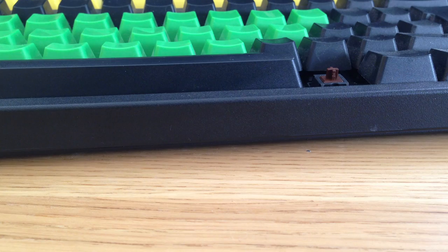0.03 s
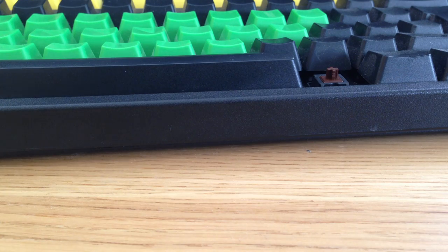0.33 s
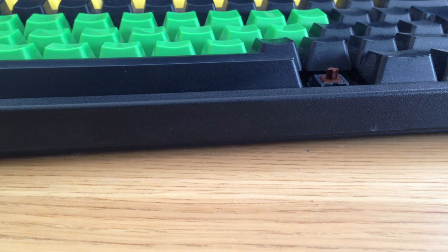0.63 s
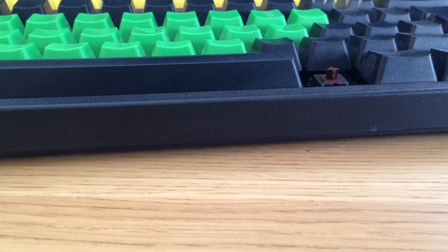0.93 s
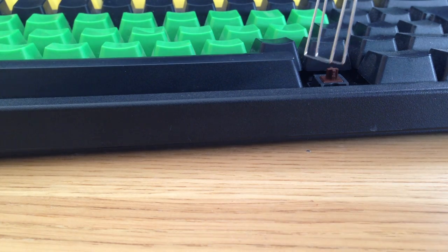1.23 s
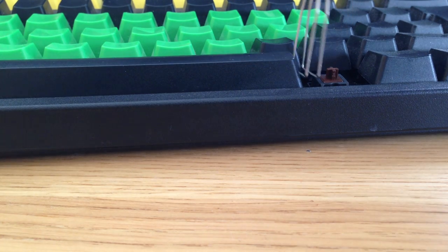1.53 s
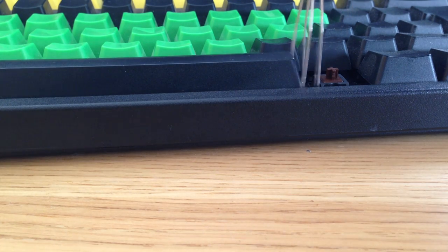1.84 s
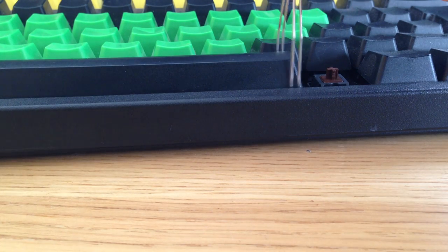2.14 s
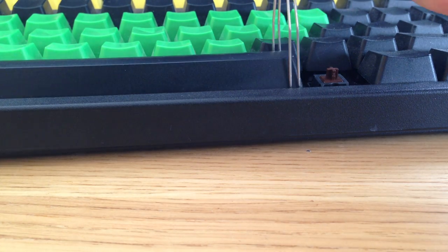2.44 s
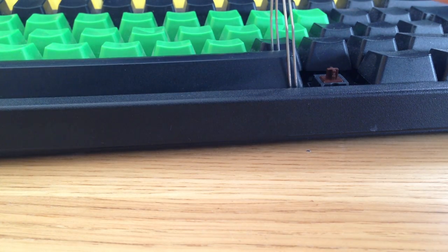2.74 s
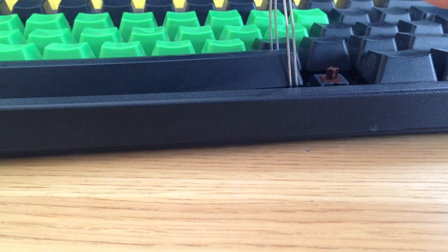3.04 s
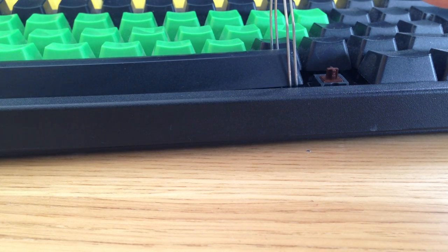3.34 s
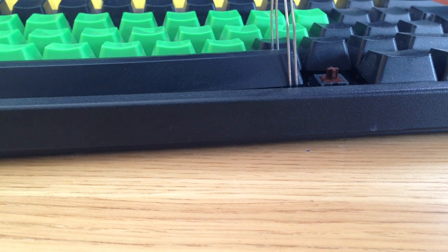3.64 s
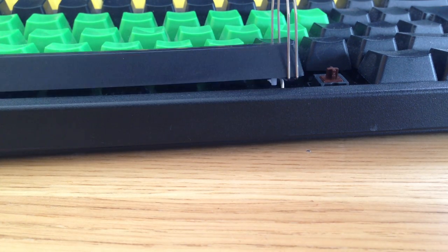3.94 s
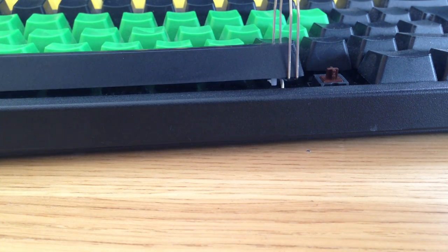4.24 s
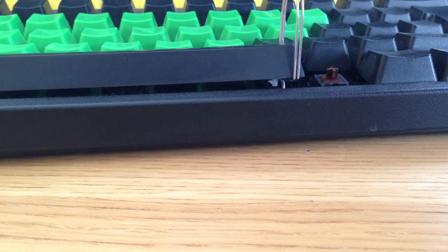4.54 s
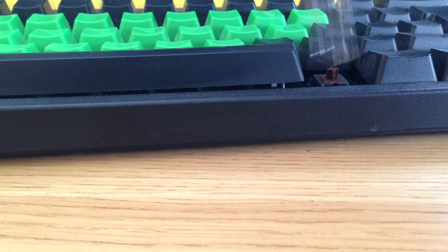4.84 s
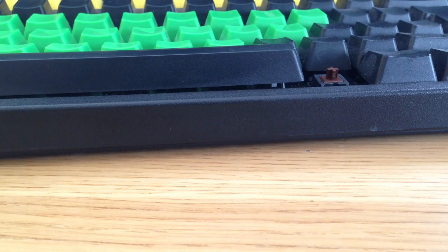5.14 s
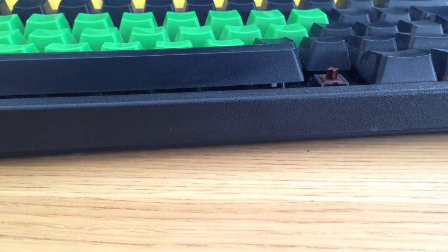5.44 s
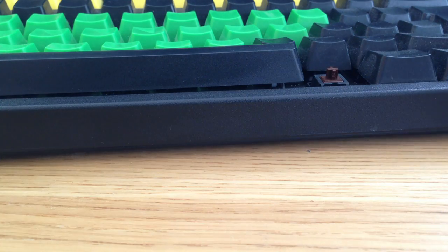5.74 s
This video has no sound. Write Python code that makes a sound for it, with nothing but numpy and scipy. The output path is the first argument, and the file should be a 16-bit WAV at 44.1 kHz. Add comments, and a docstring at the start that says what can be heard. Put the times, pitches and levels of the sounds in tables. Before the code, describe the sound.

A quiet furnished room holds faint ventilation and a low electrical hum throughout. At about 1.2 seconds, close to the microphone, a wire puller touches a keyboard's plastic keycaps with a tiny squeak, then lands with a sharp, bouncing click at 1.3. Light ticks, short gritty rubs and brief wire pings continue until a bright click at 2.4. One small ping comes at 3 seconds, followed by a couple of barely audible ticks. Around 4 seconds the spacebar comes off its switch with a quick creaking pop and a slight thud. At 4.8 the wires spring free with a bright ping and a very short chatter, followed by a faint squeak. From 5.6 to 5.9 the loose, hollow spacebar clatters in a rapid run of plastic clacks, the loudest moment, ending with a low double knock into the wooden desk. Everything sounds close and fairly dry.

```python
"""A wire keycap puller works the spacebar off a mechanical keyboard, close up on a wooden desk.
The wires tick and rub against the caps, the bar pops off its stem, the puller springs free with a
chatter and a squeak, and the loose bar clatters on its stabiliser. Each contact is a touch and a short
gritty slide that ring the part and the case; heavy blows also knock the desk.
Behind it all is a quiet, furnished room with faint ventilation and mains hum."""
import sys
import numpy as np
from scipy import signal
from scipy.fft import rfft, irfft
from scipy.io import wavfile
from scipy.ndimage import uniform_filter1d

SR = 44100
rng = np.random.default_rng(int(sys.argv[2]) if len(sys.argv) > 2 else 0)


def transcribe(u):
    """Save the signal u as a 16-bit wav file named by the first command-line argument.

    u: samples, shape (n,) or (channels, n), limited to [-1, 1]; the rate is SR.
    q: integer samples, one column per channel.
    """
    v = np.clip(np.atleast_2d(u).T, -1, 1)
    q = np.round(v * 32767).astype(np.int16)
    wavfile.write(sys.argv[1], SR, q)


N = 260190
TIME, RING_T = np.arange(N) / SR, np.arange(SR // 4) / SR

# Contact levels are set ahead of each part's gain; a harder touch has more treble and less clack.
# wires ticking on the caps: start_s, slide_s, level_db, hardness_db, thud_db
PULLER_HITS = [(1.194, .013, -49, -2.5, -65), (1.2885, .0015, -53, -2, -68), (1.301, .002, -47.5, 3, -67),
               (1.526, .004, -48.5, 0, -76), (1.5958, .0033, -43, 3, -66), (1.667, .009, -51.5, 1, -50),
               (1.939, .011, -41.5, -2.5, -70), (1.9662, .0046, -40, -4.5, -33.5),
               (1.992, .003, -50, 4.5, -43), (2.0198, .0046, -36, -1.5, -43.5),
               (2.1828, .0046, -53, -2.5, -52), (2.2155, .003, -54, -4, -44), (2.266, .012, -53, -3, -61),
               (2.4055, .003, -33.5, 7, -72), (2.411, .004, -34, 5.5, -60), (2.4298, .002, -44, -2.5, -43),
               (3.039, .0023, -48, 0, -63), (3.132, .003, -61, -7, -59), (3.7905, .003, -56, -10.5, -59),
               (4.786, .0056, -53, 3, -70)]
# the puller's hard landing on a cap: start_s, slide_s, level_db, hardness_db, thud_db
LANDING = (1.3176, .0012, -26, 9.5, -56)
# the struck cap rattling in its play: delay_s, slide_s, level_db, hardness_db, thud_db
CAP_RATTLE = (.0155, .003, -46, 1, -69)
# wires springing over the bar's edge: start_s, slide_s, level_db, hardness_db, thud_db
RELEASE = (4.8001, .0022, -31.3, 0, -63)
# knocks of the loose spacebar: start_s, slide_s, level_db, hardness_db, thud_db
BAR_HITS = [(5.6005, .0035, -26.5, 5, -55), (5.6508, .0035, -32.5, 0, -54), (5.675, .004, -44, -6, -52),
            (5.6972, .0046, -17.5, -2.5, -41), (5.7242, .0033, -17.3, -1, -47),
            (5.7525, .005, -41.5, 7, -50), (5.7635, .0055, -30, 2.5, -43), (5.7735, .006, -30, -2.5, -45),
            (5.808, .018, -41, 7.5, -40), (5.8488, .0005, -25, 0, -34), (5.877, .0016, -32, 0, -44)]
# creak, pop and knocks at the switch: start_s, slide_s, level_db, hardness_db, thud_db
SWITCH_HITS = [(3.971, .005, -38.5, 0, -39), (3.9757, .002, -30, 4.5, -38), (3.9862, .0014, -25, -4, -33.5),
               (4.0048, .0022, -45, 0, -35), (5.8325, .005, -33, 1.5, -25)]
# plucked wires: start_s, pitch_hz, peak_db, t60_s
WIRE_PINGS = [(1.3178, 6500, -25, 0.027), (1.9665, 3750, -31, .018), (2.02, 3700, -27, .022),
              (2.406, 3530, -29, 0.036), (2.4062, 10500, -27, .022), (2.4125, 13400, -30, .02),
              (2.413, 6910, -28, 0.024), (3.038, 2610, -33, 0.022), (4.7993, 8650, -12.5, 0.0096),
              (5.6, 5570, -25.5, 0.056), (5.651, 2705, -28, .04)]
# wires sliding on plastic: start_s, length_s, rumble_db (before its trim), scratch_db
RUBS = [(1.205, .09, -61, -54.5), (1.62, .08, -56, -62), (1.722, .09, -47, -53), (2.19, .11, -51, -56)]
# a wire dragging on a cap: start_s, length_s, pitch_hz, level_db
SQUEAKS = [(1.186, .036, 4300, -44), (4.87, .03, 1790, -57), (4.905, .05, 1810, -50.5)]
# blows that press the keyboard onto the desk: start_s, level_db
DESK_KNOCKS = [(1.318, -38), (3.977, -43), (5.833, -28), (5.849, -33)]

# ring of the puller against a cap: pitch_hz, gain_db, t60_s
PULLER_MODES = [(440, -17, 0.023), (702, -8.5, 0.0294), (840, -15, 0.036), (1119, -1, .04),
                (1352, 1, 0.033), (1743, 0.5, 0.032), (2148, -6, 0.028), (2730, 2.5, 0.024),
                (3730, 9.5, 0.023), (4260, 2, .016), (5070, -3, .014), (6450, 3, 0.0089),
                (7080, -1, 0.0093), (7720, -9, 0.0085), (8950, 2, 0.0092), (10500, -10, .009),
                (13300, -13.5, 0.0072)]
# ring of the sprung wire loop: pitch_hz, gain_db, t60_s
WIRE_MODES = [(480, -18, 0.037), (741, 7, .045), (1035, -2, .05), (1383, 13, 0.08), (2000, 0, 0.056),
              (2680, -4.5, 0.064), (3535, 3, 0.047), (5275, -8, 0.035), (8300, 2, 0.034), (9800, 2, 0.04),
              (13400, 2, .02)]
# ring of the hollow spacebar and stabiliser: pitch_hz, gain_db, t60_s
BAR_MODES = [(515, -20.5, 0.064), (868, -12, 0.09), (1136, -12.5, 0.05), (1410, 10, 0.045),
             (1460, -4, 0.078), (1734, 3.5, 0.048), (2080, -1, 0.056), (2327, -8, 0.06), (2735, 2.5, 0.027),
             (2860, -3, 0.057), (3120, -1.5, 0.055), (3430, 4, 0.026), (4120, -6, 0.043),
             (5770, -2.5, 0.055), (6680, -1, 0.024), (8360, -7.5, 0.073), (9950, -5, 0.023),
             (10700, -7, 0.042), (14200, -13, 0.019)]
# ring of the switch plate: pitch_hz, gain_db, t60_s
PLATE_MODES = [(417, -8, 0.058), (566, -16, 0.031), (680, -20, 0.072), (800, -8, 0.051), (982, 2.5, 0.054),
               (1045, 3, 0.05), (1350, 5.5, 0.036), (2060, -8.5, .03), (2510, -8, 0.055), (3750, 6.5, .016),
               (5200, -17, 0.017), (10400, -10, .015), (14200, -2, .012)]
# low body of the keyboard case: pitch_hz, gain_db, t60_s
CASE_MODES = [(154, -13, .08), (267, -3.5, 0.16), (281.5, -8.5, 0.123), (366.7, -4.5, 0.13)]
# wooden ring of the desk top: pitch_hz, gain_db, t60_s
DESK_MODES = [(455, -6, .06), (545, -9, .06), (635, 0, .07), (770, -4, .04), (860, -3, .06)]

# a contact's thud, clack, click, tick and sheen bands: low_hz, high_hz
REGISTERS = [(100, 410), (410, 2400), (2400, 5500), (5500, 11000), (11000, 17000)]
# EQ of each part: clack_db, click_db, tick_db, sheen_db
PULLER_EQ = (0, 0, -3.5, -13)
WIRE_EQ = (-2.5, 0, 6, 3.5)
BAR_EQ = (-.5, 0, -7, -15)
SWITCH_EQ = (-.5, 0, -8, -10)
# EQ change per dB of hardness: clack_db, click_db, tick_db, sheen_db
HARDNESS_TILT = (-1, 0, 1, 1.4)
# colour of wire scratching plastic: frequency_hz, gain_db
SCRATCH_COLOUR = [(290, -28), (500, -1), (811, -7.5), (1370, 2), (1720, -8), (2640, -9.5), (3180, -12.5),
                  (15000, -31)]
# decay of the room: frequency_hz, t60_s
ROOM_T60 = [(150, 0.28), (1000, 0.23), (4000, 0.19), (15000, 0.13)]
# colour of the ventilation: frequency_hz, gain_db
AIR_COLOUR = [(25, -45), (70, -27), (100, -11.5), (150, -5), (260, 0.5), (420, -8), (620, -7.5), (950, -14),
              (1520, -9), (1850, -14.5), (2600, -11.5), (5000, -19), (9000, -24), (15500, -25)]
# steady hum tones: pitch_hz, rms_db
HUM_TONES = [(120, -68), (158, -72), (570, -83.5)]


def puller_ticks():
    """The puller ticks on the caps; its hard landing bounces ever quicker and softer, rattling a cap."""
    bounces = rebounds(LANDING, gap_s=.0476, gap_ratio=.464, loss_db=7.3, count=3, softer_db=1.5)
    delay_s, *touch = CAP_RATTLE
    rattles = [(start_s + delay_s, *touch) for start_s, *_ in bounces[:-1]]
    return contacts(bounces + rattles + PULLER_HITS, PULLER_MODES, PULLER_EQ,
                    crack_db=-1.5, crack_t60=.026, damping_slope=.96, catch_s=.0009, grain_db=6.5)


def wire_chatter():
    """The wires spring free of the bar and chatter, ever slower and fainter."""
    hits = rebounds(RELEASE, gap_s=.0045, gap_ratio=1.08, loss_db=1.75, count=7)
    return contacts(hits, WIRE_MODES, WIRE_EQ,
                    crack_db=-1, crack_t60=.025, damping_slope=.52, catch_s=.002, grain_db=5.5)


def wire_pings():
    """Plucked wires ring briefly, at a pitch set by their free length."""
    out = np.zeros(N)
    for start_s, *mode in WIRE_PINGS:
        add(out, start_s, ringing([mode])[0])
    return out


def wire_rubs(grain_db=4.5, rumble_trim_db=-4.5):
    """Friction is a stream of uneven grains: it scratches directly and stirs a rumble in the case."""
    grains = rng.standard_normal(N)
    grains *= from_db(grain_db * np.repeat(rng.standard_normal(N // 40 + 1), 40)[:N])
    scratch = coloured(grains, SCRATCH_COLOUR)
    case_ring = ringing(CASE_MODES).sum(axis=0)
    rumble = from_db(rumble_trim_db) * unit_rms(signal.fftconvolve(grains, case_ring)[:N])
    return sum(stroke(start_s, length_s) * (from_db(rumble_db) * rumble + from_db(scratch_db) * scratch)
               for start_s, length_s, rumble_db, scratch_db in RUBS)


def wire_squeaks(jitter=.045, hiss_gain=.8, rolloff_hz=4800):
    """Stick and slip at an unsteady rate gives a brief, rough whistle with overtones."""
    starts, _, pitches, _ = np.transpose(SQUEAKS)
    pitch_hz = np.interp(TIME, starts, pitches)
    wobble = unit_rms(uniform_filter1d(rng.standard_normal(N), size=40))
    phase = 2 * np.pi * np.cumsum(pitch_hz * (1 + jitter * wobble)) / SR
    whistle = sum(np.sin(k * phase) / (1 + (k * pitch_hz / rolloff_hz) ** 4) for k in range(1, 5))
    hiss = hiss_gain * band(rng.standard_normal(N), 1100, 8000)
    pressure = sum(from_db(db) * stroke(start_s, length_s) for start_s, length_s, _, db in SQUEAKS)
    return pressure * unit_rms(unit_rms(whistle) + hiss)


def spacebar_clatter(lag_slides=1.6, loss_db=5.5, softer_db=2):
    """The loose bar lands on one end, then rocks onto the other, weaker and softer."""
    far_end = [(start_s + lag_slides * slide_s, slide_s, db - loss_db, hard - softer_db, thud - loss_db)
               for start_s, slide_s, db, hard, thud in BAR_HITS]
    return contacts(list(BAR_HITS) + far_end, BAR_MODES, BAR_EQ,
                    crack_db=2.5, crack_t60=.021, damping_slope=.4, catch_s=.00064, grain_db=6)


def switch_pop():
    """The stem creaks and pops out, the switch slams up and rebounds; later the bar lands back on it."""
    return contacts(SWITCH_HITS, PLATE_MODES, SWITCH_EQ,
                    crack_db=.5, crack_t60=.013, damping_slope=.23, catch_s=.001, grain_db=5, spread_db=2.5)


def desk_knocks():
    """The desk top answers a heavy blow with a short wooden knock."""
    out, modes = np.zeros(N), ringing(DESK_MODES)
    for start_s, db in DESK_KNOCKS:
        add(out, start_s, from_db(db) * rng.choice([-1, 1], len(modes)) @ modes)
    return out


def rebounds(first, gap_s, gap_ratio, loss_db, count, softer_db=0):
    """A run of ever weaker contacts; gap and slide change by the same ratio each time."""
    start_s, slide_s, db, hardness, thud = first
    hits = []
    for k in range(count):
        stretch, drop_db = gap_ratio ** k, k * loss_db
        hits.append((start_s, slide_s * stretch, db - drop_db, hardness - k * softer_db, thud - drop_db))
        start_s += gap_s * stretch
    return hits


def contacts(hits, modes, eq_db, crack_db, crack_t60, damping_slope, catch_s, grain_db, spread_db=2):
    """Each contact rings the part and the case; the hardness of the touch tilts the EQ."""
    out = np.zeros(N)
    clear = ringing(modes + CASE_MODES)
    dense = crack_modes(modes, crack_t60, damping_slope)
    for start_s, slide_s, level_db, hardness_db, thud_db in hits:
        strengths = from_db(spread_db * rng.standard_normal(len(clear))) * rng.choice([-1, 1], len(clear))
        crack = from_db(crack_db) * rng.standard_normal(len(dense)) @ dense
        ring = signal.fftconvolve(strengths @ clear + crack, contact_force(slide_s, catch_s, grain_db))
        upper_db = level_db + np.array(eq_db) + hardness_db * np.array(HARDNESS_TILT)
        for edges, db in zip(REGISTERS, (thud_db, *upper_db)):
            gain = from_db(db) * np.sqrt(SR / 100)   # the energy of 10 ms at this level
            add(out, start_s, gain * unit_energy(band(ring, *edges)))
    return out


def crack_modes(modes, t60_at_1k, damping_slope, count=260):
    """Between the clear modes lie many heavily damped ones: a crack whose treble dies first."""
    hz = np.linspace(300, 16000, count) + rng.uniform(-30, 30, count)
    db = at_hz(np.array(modes)[:, :2], hz)
    return ringing(zip(hz, db, t60_at_1k * (hz / 1000) ** -damping_slope))


def contact_force(slide_s, catch_s, grain_db, build_up=.2, evenness=.41):
    """A first touch, then tiny uneven catches that outweigh it once the slide is longer than catch_s."""
    t = RING_T[:SR // 25]
    grains = rng.standard_normal(len(t)) * from_db(grain_db * rng.standard_normal(len(t)))
    pressure = (1 - np.exp(-t / (build_up * slide_s))) * np.exp(-(t / slide_s) ** 2)
    force = slide_s / catch_s * unit_energy(grains * pressure)
    force[0] += 1   # the first touch
    # friction has little pitch of its own, so even out its spectrum
    spectrum = rfft(force, 2 * len(t))
    return irfft(spectrum / (np.abs(spectrum) + .2) ** evenness)[:len(t)]


def stroke(start_s, length_s, rise_share=.4):
    """The pressure of a sliding stroke swells and lets go."""
    corners_s = [start_s, start_s + length_s * rise_share, start_s + length_s]
    return np.sin(np.pi / 2 * np.interp(TIME, corners_s, [0, 1, 0]))


def room(x, early_db=-12, early_t60=.1, tail_db=-20.5):
    """Reflections off the desk and nearby things, then the short tail of a furnished room."""
    t = np.arange(SR // 2) / SR
    echoes = rng.standard_normal(len(t)) * (rng.random(len(t)) < 1500 / SR) * (t > .002)
    edges = np.geomspace(100, 17000, 9)
    tail = sum(band(rng.standard_normal(len(t)), low, high) * fade(at_hz(ROOM_T60, np.sqrt(low * high)), t)
               for low, high in zip(edges, edges[1:]))
    early = from_db(early_db) * unit_energy(echoes * fade(early_t60, t))
    late = from_db(tail_db) * unit_energy(tail * (t > .008))
    return signal.fftconvolve(x, early + late)[:N]


def ventilation(level_db=-58.5, ripple_db=2.7):
    """A bed of moving air, its spectrum finely rippled by the room's standing waves."""
    spectrum = rfft(rng.standard_normal(N))
    ripple = unit_rms(uniform_filter1d(rng.standard_normal(len(spectrum)), size=130))
    depth_db = ripple_db / (1 + (np.fft.rfftfreq(N, 1 / SR) / 5000) ** 2)
    air = irfft(spectrum * from_db(depth_db * ripple), N)
    return from_db(level_db) * coloured(air, AIR_COLOUR)


def hum():
    """Mains hum with two fainter steady tones."""
    return sum(np.sqrt(2) * from_db(db) * np.sin(2 * np.pi * hz * TIME) for hz, db in HUM_TONES)


def ringing(modes):
    """One decaying sine per mode."""
    return np.array([from_db(db) * np.sin(2 * np.pi * hz * RING_T) * fade(t60) for hz, db, t60 in modes])


def fade(t60, t=RING_T):
    """Exponential decay, 60 dB down after t60."""
    return np.exp(-np.log(1000) * t / t60)


def band(x, low_hz, high_hz):
    """Causal band-pass."""
    return signal.sosfilt(signal.butter(3, [low_hz, high_hz], "band", fs=SR, output="sos"), x)


def coloured(x, colour):
    """EQ a steady signal and scale it to unit rms."""
    gain = from_db(at_hz(colour, np.fft.rfftfreq(N, 1 / SR)))
    return unit_rms(irfft(rfft(x) * gain, N))


def at_hz(points, hz):
    """Read a curve on a log-frequency axis."""
    points_hz, values = np.transpose(points)
    return np.interp(np.log(np.maximum(hz, 1)), np.log(points_hz), values)


def from_db(db):
    """Decibels to gain."""
    return 10 ** (np.asarray(db) / 20)


def unit_rms(x):
    """Scale to unit rms."""
    return x / np.sqrt(np.mean(x ** 2) + 1e-20)


def unit_energy(x):
    """Scale to unit energy."""
    return x / np.sqrt(np.sum(x ** 2) + 1e-20)


def add(out, start_s, sound):
    """Mix a sound in at its cue."""
    at = round(start_s * SR)
    out[at:at + len(sound)] += sound[:N - at]


def scene():
    """Mono mix: puller and keyboard up front, a little room, air and hum behind."""
    close = from_db(-1.18) * puller_ticks() + from_db(.9) * wire_chatter() + wire_pings()
    close += from_db(-.26) * spacebar_clatter() + from_db(.5) * switch_pop()
    close += wire_rubs() + wire_squeaks() + desk_knocks()
    close = band(close, 120, 14800)   # the close sounds keep little below 120 Hz
    return (close + room(close) + ventilation() + hum())[None]


def record(dry):
    """Open on a moment of silence and cut the very top steeply."""
    silence_s, cutoff_hz = .087, 15600
    low_pass = signal.ellip(10, .1, 70, cutoff_hz, fs=SR, output="sos")
    return signal.sosfilt(low_pass, dry * (TIME > silence_s))


dry = scene()
out = record(dry)
transcribe(out)
```